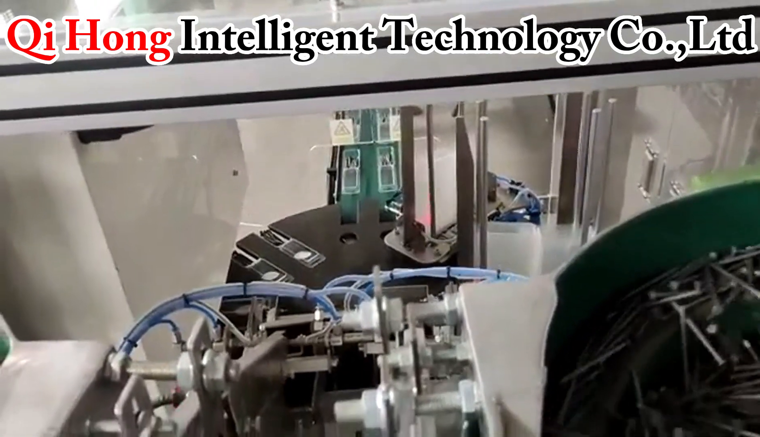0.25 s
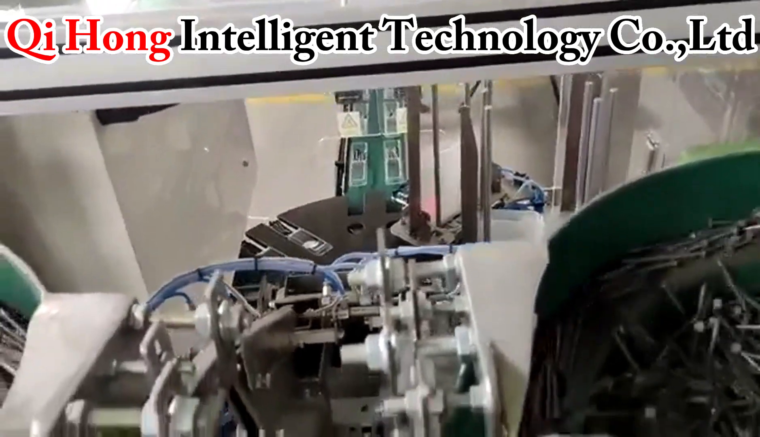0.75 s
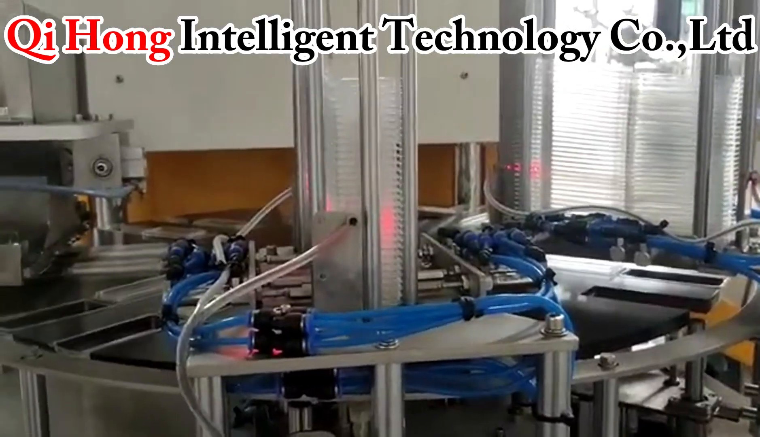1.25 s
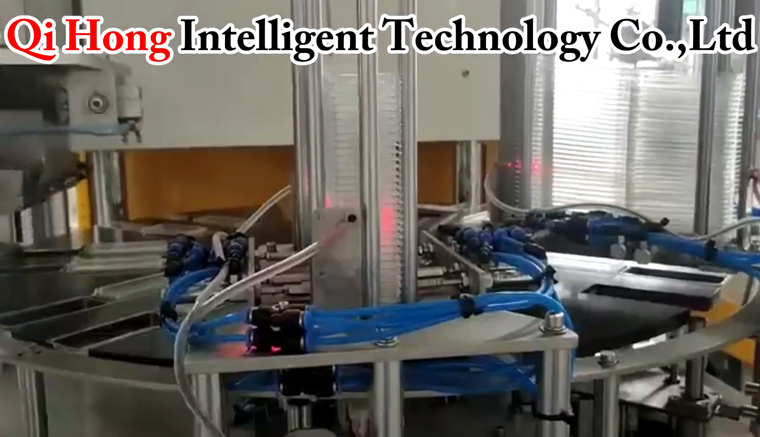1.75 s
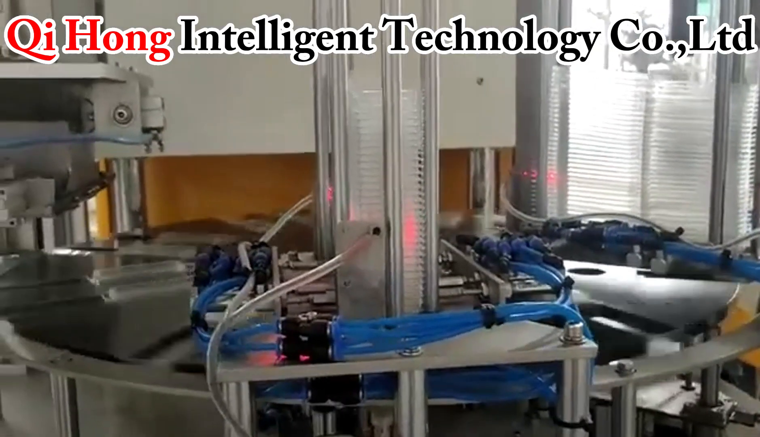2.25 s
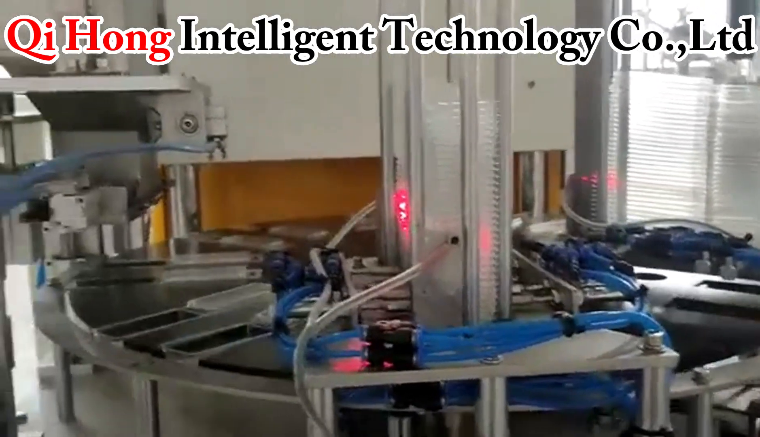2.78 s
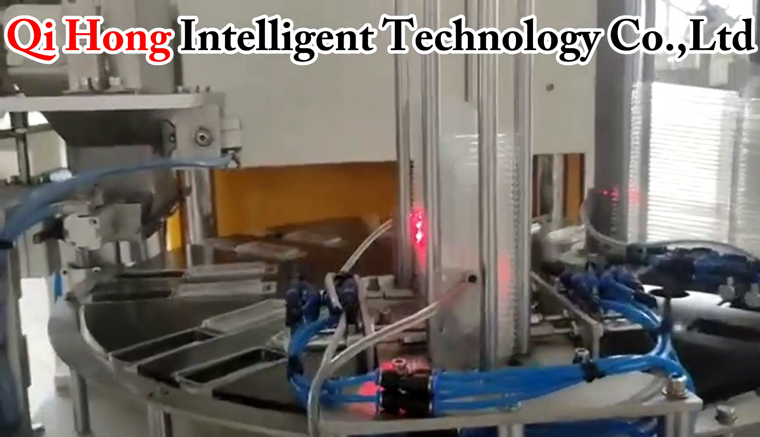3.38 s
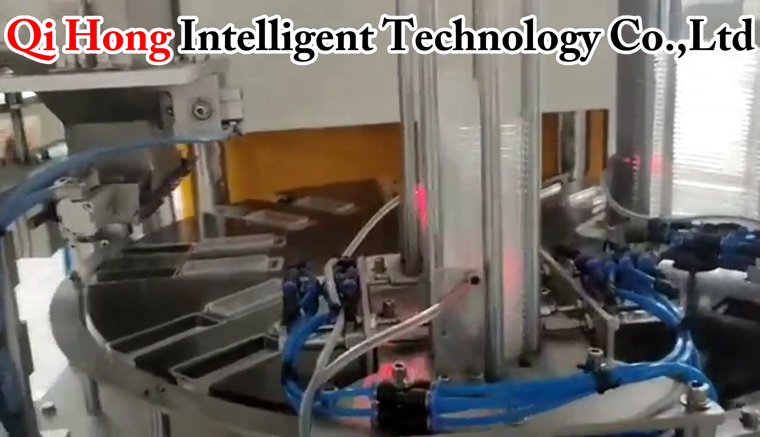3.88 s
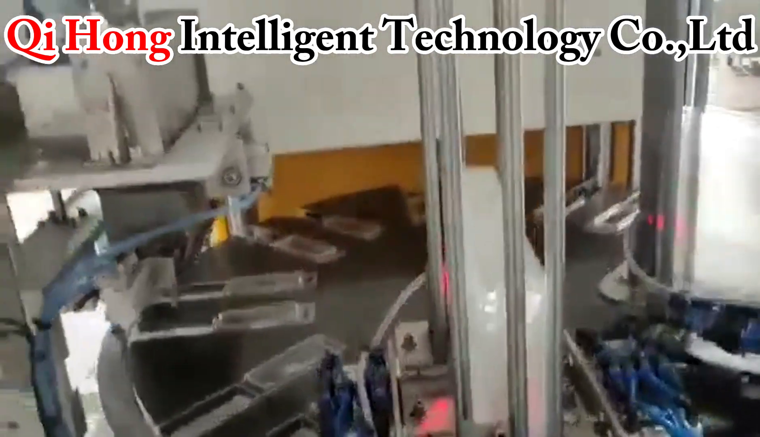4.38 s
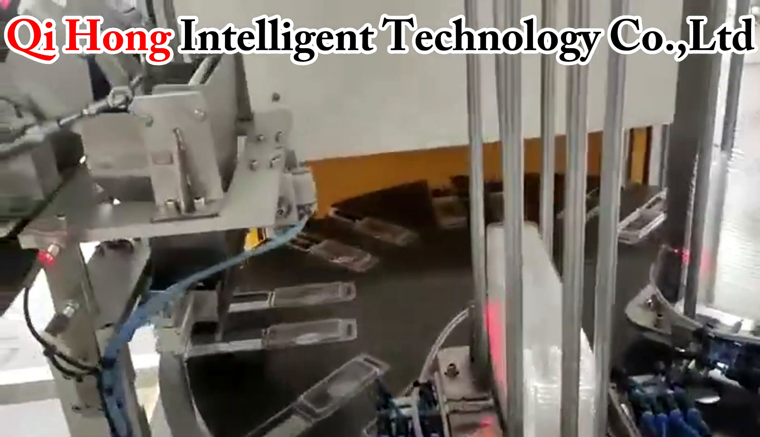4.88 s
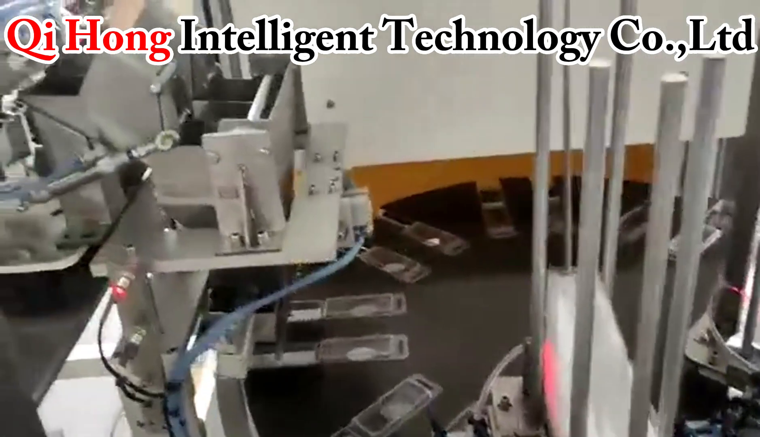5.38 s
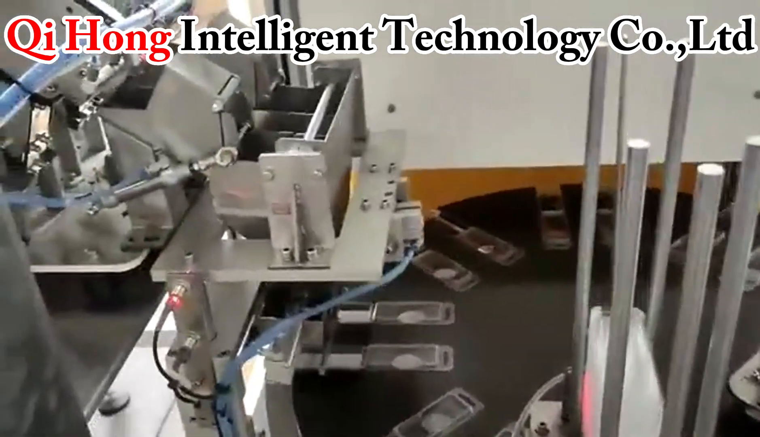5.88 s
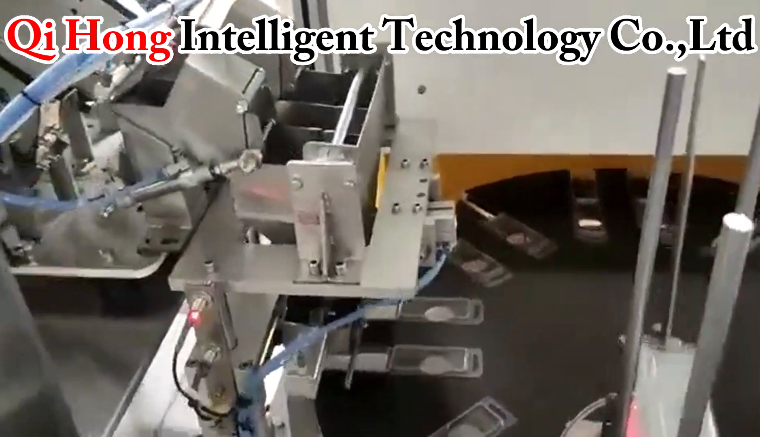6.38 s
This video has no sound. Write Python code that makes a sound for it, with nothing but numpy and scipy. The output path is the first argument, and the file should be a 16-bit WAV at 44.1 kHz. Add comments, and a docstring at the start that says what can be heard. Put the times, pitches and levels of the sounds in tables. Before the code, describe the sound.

Loud air hiss over a humming, rattling parts feeder, then a quieter motor drone with metallic knocks and valve puffs, building to heavy hissing bursts.

```python
"""Air hisses first, over a humming feeder and the low rumble of a factory hall: a pneumatic packing machine.
At 0.83 s the sound fades out and in at a cut to a second shot, taken elsewhere, near two motors.
Hiss, rumble and clatter are shaped noise, the drives are wavering tones, and strokes and puffs gate the air.
Cylinder knocks ring the steel frame and valves push out air; knocks and pushes also reflect in the hall."""
import sys
import numpy as np
from scipy import signal
from scipy.io import wavfile
from scipy.ndimage import uniform_filter1d

SR = 44100
rng = np.random.default_rng(int(sys.argv[2]) if len(sys.argv) > 2 else 0)


def generate_wav(sig):
    """Save sig (samples, or channels by samples) to the path in sys.argv[1] as 16-bit PCM at SR."""
    pcm = np.round(np.clip(np.atleast_2d(sig).T, -1, 1) * 32767).astype(np.int16)
    wavfile.write(sys.argv[1], SR, pcm)


N = 292383
CUT_S = .83  # cut from the first shot to the second, taken at another place


def amp(db):
    """Decibels to gain."""
    return 10 ** (np.asarray(db) / 20)


def unit(x):
    """Scales to rms 1."""
    return x / np.sqrt(np.mean(x ** 2) + 1e-20)


def smooth_twice(x, first, second, axes=(-1, -1)):
    """Two moving averages, their lengths given in samples, frames or bins."""
    return uniform_filter1d(uniform_filter1d(x, first, axis=axes[0]), second, axis=axes[1])


def curve(rows, column=1):
    """One column of a time table, joined by straight lines at every sample."""
    rows = np.asarray(rows)
    return np.interp(np.arange(N) / SR, rows[:, 0], rows[:, column])


def by_place(first, second):
    """What is heard at the first place, then from the cut on at the second."""
    return np.where(np.arange(N) < CUT_S * SR, first, second)


def resonate(x, hz, width):
    """Shifts hz down to zero, smooths, and shifts back: a resonance of gain 1."""
    turn = np.exp(2j * np.pi * hz * np.arange(len(x)) / SR)
    r = np.exp(-np.pi * width / SR)
    return 2 * (turn * signal.lfilter([1 - r], [1, -r], x / turn)).real


def resonate_twice(x, hz, width):
    """Two equal resonances in a row, scaled to rms 1, for steeper skirts."""
    return unit(resonate(resonate(x, hz, width), hz, width))


def noise(spectrum, size, patchy_db, ringing_db, flicker_db):
    """Random short-time spectra with broad patches, thin lingering streaks and a flicker shared by all bins."""
    hop, hz = size // 4, np.fft.rfftfreq(size, 1 / SR)
    real, imag, patches, streaks = rng.standard_normal((N // hop + 5, len(hz), 4)).T
    # axis 0 is frequency, axis 1 is time
    patches = unit(smooth_twice(patches, 8, 7, axes=(0, 1)))
    streaks = unit(smooth_twice(streaks, 2, 16, axes=(0, 1)))
    flicker = unit(uniform_filter1d(rng.standard_normal(real.shape[1]), size=4))
    f, db = np.transpose(spectrum)
    colour = np.interp(np.log(hz + 1), np.log(f + 1), db)[:, None]
    level_db = colour + patchy_db * patches + ringing_db * streaks + flicker_db * flicker
    frames = (real + 1j * imag) * amp(level_db)
    return unit(signal.istft(frames, nperseg=size, noverlap=size - hop)[1][:N])


def hum(lines):
    """Each line is a tone blended with narrow noise, so that it wavers in level and pitch."""
    t, out = np.arange(N) / SR, 0
    for hz, db, width, steady in lines:
        wavering = resonate_twice(rng.standard_normal(N), hz, width)
        tone = np.sqrt(2) * np.sin(2 * np.pi * (hz * t + rng.random()))
        out = out + amp(db) * (np.sqrt(steady) * tone + np.sqrt(1 - steady) * wavering)
    return out


def hall_rumble():
    """Low noise of the hall, swelling and sinking under everything."""
    # colour of the rumble, relative: [f/Hz, level/dB]
    spectrum = [(8.8, -41), (15, 9.5), (32, -6), (75, -5), (130, -0.5), (189, -8), (317, -12.5),
                (363, -18.5), (586, -20), (628, -18), (900, -27.5), (1170, -36), (1980, -120)]
    # loudness of the rumble: [t/s, level/dB rms]
    swell = [(0, -29), (.3, -32.5), (.5, -26), (.83, -29.5), (1.1, -37), (1.65, -35.5), (1.76, -27),
             (2.0, -39.5), (2.6, -39.5), (2.95, -35), (3.3, -38), (3.8, -44.5), (4.33, -38), (4.45, -26.5),
             (4.64, -33), (4.8, -41), (5.0, -31.5), (5.5, -31.5), (5.85, -27), (6.17, -33.5), (6.63, -25)]
    return amp(curve(swell)) * noise(spectrum, size=2048, patchy_db=1.0, ringing_db=.8, flicker_db=.8)


def feeder():
    """Vibrating feeder bowl and motors close to the first place, over a steady drone."""
    # drone: [f/Hz, level/dB rms, width/Hz of each resonance, steady share 0-1]
    drone = [(40, -29, 8, .5)]
    # bowl and motors, before their swell: [f/Hz, level/dB rms, width/Hz of each resonance, steady share 0-1]
    bowl_lines = [(107.7, -34, 14, .4), (160, -39, 12, .3), (259, -41, 14, .3), (629.8, -38, 14, .55),
                  (678.3, -41, 16, .3), (737.5, -45, 16, .2), (791, -49, 16, .2), (915.2, -45, 35, .1),
                  (1160, -51, 16, .1), (6660, -42, 35, 0)]
    # gain on bowl and motors: [t/s, level/dB]
    swell = [(0, -5), (.3, 3), (.83, 4.5)]
    return hum(drone) + hum(bowl_lines) * amp(curve(swell))


def motors():
    """Two motors near the second place, each a group of tones with its own swell."""
    # one list per motor, before its swell: [f/Hz, level/dB rms, width/Hz of each resonance, steady share 0-1]
    motor_lines = [
        [(37.6, -39, 1.3, 0.2), (99.8, -40.5, 4.1, .5), (276, -63.5, 12, 0.5), (1190, -65, 16, 0),
         (1366, -63, 19, .2), (1536, -64, 14, 0), (1773, -64.5, 13, 0)],
        [(127.3, -46.5, 16, .3), (316.7, -48, 12, 0.29), (631, -58, 25, 0), (1842, -57, 85, 0.01)],
    ]
    # gain on each motor: [t/s, first level/dB, second level/dB]
    swell = [(.83, -10, -30), (.9, 2.5, -25), (1.7, 2, -10), (1.95, -14, -18), (4.8, -20, -18),
             (5.0, -12.5, -8.5), (5.4, -18, 5.5), (6.63, -3.5, 7)]
    return sum(hum(lines) * amp(curve(swell, column=k + 1)) for k, lines in enumerate(motor_lines))


def moving_parts(level):
    """Blurred clatter: nails shaking in the feeder bowl at the first place, slides and chains at the second."""
    # nails in the bowl, relative: [f/Hz, level/dB]
    nail_spectrum = [(120, -32), (200, -16), (264, -9), (566, -5.5), (632, -5), (834, -8), (945, -3.5),
                     (1370, -11.5), (3110, -14), (5500, -13), (7150, -39), (12100, -120)]
    # slides and chains, relative: [f/Hz, level/dB]
    slide_spectrum = [(180, -21.5), (300, -2), (383, -12.5), (738, -7.5), (942, -13), (1280, -13),
                      (1480, -15), (2780, -17), (4640, -15), (5500, -9.5), (7150, -23), (12100, -120)]
    nails = noise(nail_spectrum, size=1024, patchy_db=1.5, ringing_db=2.5, flicker_db=1.3)
    slides = noise(slide_spectrum, size=1024, patchy_db=1.6, ringing_db=3.5, flicker_db=1.1)
    return level * by_place(nails, slides)


def pushes():
    """Valve exhaust: pressure builds, then drops through zero as the valve lets go."""
    # one swing of pressure each: [t/s of the zero crossing, level/dB, width/s]
    swings = [(1.746, -32.5, 0.0029), (1.783, -29, 0.004), (2.687, -22.5, 0.002), (2.786, -29.5, 0.0046),
              (3.545, -26, 0.0031), (3.58, -28.5, 0.004), (3.619, -27.5, 0.0024), (3.701, -20, .0021),
              (4.119, -19.5, 0.0021), (4.198, -24.5, 0.0033), (4.386, -22, 0.0052), (4.439, -20, 0.0029),
              (4.458, -16, 0.0027), (4.512, -19.5, 0.008), (5.449, -18.5, 0.0034), (5.488, -26, 0.0037),
              (5.776, -17.5, 0.0031), (5.869, -15.5, 0.0022), (5.949, -15, 0.0037), (5.364, -22, 0.0034),
              (6.494, -33, 0.0032)]
    t, out = np.arange(N) / SR, 0
    for s, db, width in swings:
        swing = np.tanh(3 * (s - t) / width)
        out = out + amp(db) * swing * np.exp(-abs((t - s) / width / 1.5) ** 1.6)
    return out


def knocks():
    """Cushioned, rattling cylinder blows ring the struck parts and the frame, with a dull crack."""
    # rings of the struck parts; one blow may start several:
    # [t/s, level/dB, ring f/Hz, rise/s, crack level/dB and frame level/dB relative to the level]
    rings = [(.841, -20.5, 312, 0.0056, -11, -4), (1.73, -23.5, 340, 0.0074, -21, -13),
             (1.804, -23.5, 533, 0.0088, -6.5, 5), (1.812, -29, 538, .02, -12, -14),
             (1.813, -34, 1006, 0.015, -16, -14), (2.108, -31.5, 230, 0.0086, -22, -16),
             (2.185, -33, 282.5, 0.013, -15, -9), (2.242, -31.5, 239, 0.0087, -18, -4.5),
             (2.69, -36, 793, 0.011, -2.5, -2), (2.928, -30, 380, .012, -10, -1),
             (2.942, -23, 457, 0.0082, -16.5, -8), (2.943, -23.5, 144, 0.014, -25, -11),
             (2.964, -25, 452, 0.0087, -28, -10), (3.172, -23, 243, 0.01, -28, -19),
             (3.193, -30, 328, 0.0095, -17, -27), (3.291, -30, 261, 0.0098, -24, -12),
             (3.442, -30, 440, 0.004, -6, -21), (3.449, -19, 454.6, 0.0086, -14, -14),
             (3.536, -28.5, 770, 0.0017, -15, -23), (3.621, -31.5, 764, 0.0032, -16, -15),
             (3.755, -42, 4300, 0.0058, -21, -19), (4.209, -20, 309.9, 0.0027, -26, -15),
             (4.23, -26.5, 416, 0.0071, -25, -12), (4.311, -33.5, 1246, 0.013, -21, -10),
             (4.385, -28.5, 1280, 0.0047, -7, -7), (4.44, -27.5, 514, 0.0073, -1.5, 9),
             (4.453, -30, 1260, 0.012, -11, -15), (4.484, -27.5, 316, 0.013, -1.5, -14),
             (4.52, -26.5, 745, 0.008, -19, -13), (4.543, -25, 740, 0.0094, -26, -7),
             (4.604, -33.5, 1300, 0.015, 3, -4), (4.639, -26.5, 257.4, 0.0077, -16, 4),
             (4.854, -30, 156.8, 0.0074, -15.5, -10), (5.089, -27, 334, 0.011, -12, -8),
             (5.257, -37.5, 1314, 0.022, -3.5, 2.5), (5.546, -38, 4360, .015, -10, -9)]
    # modes of the steel frame: [f/Hz, level/dB, t60/s]
    modes = [(323, -8, .13), (455, -2, .12), (535, -6, .25), (845, -16, .05), (1020, -13, .1),
             (1270, -18, .05)]
    out, t = np.zeros(N + SR), np.arange(SR // 2) / SR
    frame = sum(amp(db - 60 * t / t60) * np.sin(2 * np.pi * hz * t) for hz, db, t60 in modes)
    dull = signal.butter(2, 1300, fs=SR)
    for s, db, hz, rise, crack_db, frame_db in rings:
        rattle = rng.standard_normal(len(t))
        u = t / rise
        push = u * np.exp((1 - u ** 1.16) / 1.06)  # the cushion stops the blow quickly
        contact = resonate_twice(rattle, 0, 130)  # uneven contact shakes level and pitch
        ring = push * np.sin(2 * np.pi * hz * t + .35 * contact) * amp(1.2 * contact)
        shake = signal.fftconvolve(push * rattle, frame)[:len(t)] / np.linalg.norm(push)
        crack = push * unit(signal.lfilter(*dull, rattle))
        at = round(s * SR)
        out[at:at + len(t)] += amp(db) * (ring + amp(frame_db) * shake + amp(crack_db) * crack)
    return out[:N]


def hall(x):
    """Sparse reflections of random sign, dying away."""
    t60 = 0.66  # s
    # one reflection somewhere in every 20 samples, the first after about 9 ms
    at = np.arange(400, SR // 2 - 20, 20)
    taps = np.zeros(SR // 2)
    signs = rng.choice([-1., 1.], len(at))
    taps[at + rng.integers(0, 20, len(at))] = signs * amp(-60 * at / SR / t60)
    return signal.fftconvolve(x, taps / np.linalg.norm(taps))[:N]


def activity():
    """Gains of hiss and clatter: strokes rise, hold and bleed away, puffs jump and die, all over an idle floor."""
    # working strokes, air blowing while parts move; the hold counts from the opening:
    # [open t/s, rise/s, hold/s, hiss level/dB, clatter level/dB, drift/dB per s during the hold]
    strokes = [(-.35, .75, 1.3, -22, -29, -3), (.83, .003, .965, -40, -44.5, 6),
               (3.17, .04, 1.12, -39.5, -50, -0.5), (4.298, .01, .37, -25, -33, 5),
               (4.8, .1, .25, -39, -43, 0), (5.188, .01, .14, -21, -31.5, -8.5),
               (5.375, 0.0086, .07, -23.5, -32.5, -3), (5.47, .01, .035, -23.5, -32, -5),
               (5.535, .02, .455, -24, -33.5, -1), (6.0, 0.016, .14, -28, -34, -6),
               (6.172, .02, .7, -27, -35, 4)]
    # short puffs as single valves fire: [peak t/s, rise/s, hiss level/dB, clatter level/dB, t60/s]
    puffs = [(0.461, .03, -23, -34, 0.18), (.59, .04, -26, -38, .4), (.842, .012, -29.5, -32, 0.58),
             (.966, 0.019, -30, -40, 0.17), (1.66, 0.057, -29, -55, 0.36), (1.814, 0.018, -27, -32, 0.11),
             (1.85, .02, -41, -46, 0.99), (1.9, .01, -37.5, -57, 0.23), (1.96, .012, -38, -51, .2),
             (2.03, .02, -50, -58, 0.17), (2.2, 0.022, -51, -52, .3), (2.31, .02, -58, -53, .3),
             (2.691, 0.014, -31.5, -45, 0.18), (2.715, .03, -50, -41, .4), (2.79, .02, -42.5, -53, 0.25),
             (2.965, .05, -40, -49, .25), (3.19, .01, -45, -48, .15), (3.25, .02, -41, -56, 0.13),
             (3.54, .01, -36.5, -46, 0.16), (3.61, .01, -39, -52, .15), (3.72, .02, -37, -44, .15),
             (4.123, 0.02, -36.5, -38.5, 0.13), (4.212, 0.025, -32.5, -35.5, 0.11),
             (4.389, .005, -17, -36, .06), (4.455, 0.11, -21, -23.5, 0.53), (4.61, .02, -22, -33, .2),
             (4.75, .03, -30, -38.5, .35), (4.944, .06, -29, -39, .2), (5.014, .01, -28, -39, 0.12),
             (5.052, .008, -26, -34, 0.23), (5.08, 0.023, -24, -31, .35), (5.27, 0.032, -23.5, -30, 0.21),
             (5.556, 0.017, -25, -30.5, 0.13), (5.63, .015, -28, -31, 0.16), (5.92, .01, -25.5, -37, .15),
             (5.969, 0.017, -24, -29.5, 0.14)]
    idle_db = [[-60.5], [-56]]  # hiss of leaks, clatter of far machines
    release = np.array([[260], [120]])  # dB per s: pressure bleeds away fast, parts run down slower
    sputter_db, sputter_s = .6, .025
    t = np.arange(N) / SR
    power = amp(idle_db) ** 2 * np.ones(N)
    for start, rise, hold, hiss_db, clatter_db, drift in strokes:
        u = t - start
        held = amp(drift * np.minimum(u, hold) - release * np.maximum(u - hold, 0))
        same_shot = (start < CUT_S) == (t < CUT_S)
        shape = np.clip(u / rise, 0, 1) * held * same_shot
        power += (amp([[hiss_db], [clatter_db]]) * shape) ** 2
    for s, rise, hiss_db, clatter_db, t60 in puffs:
        near = slice(max(round((s - rise) * SR), 0), round((s + t60) * SR))
        u = t[near] - s
        shape = np.clip(1 + u / rise, 0, 1) ** 2 * amp(-60 * np.maximum(u, 0) / t60)
        power[:, near] += (amp([[hiss_db], [clatter_db]]) * shape) ** 2
    # unsteady flow shakes hiss and clatter together
    span = round(sputter_s * SR / 2)
    sputter = unit(smooth_twice(rng.standard_normal(N), span, span))
    return np.sqrt(power) * amp(sputter_db * sputter)


def jets(level):
    """Turbulent air from nozzles and valves."""
    # colour of the hiss, peaked by the microphone port, relative: [f/Hz, level/dB]
    spectrum = [(2350, -26.5), (4000, -14.5), (4790, -18.5), (5310, -7), (6130, 4.5), (6810, 2), (7550, -2),
                (7780, -11.5), (8100, -40.5), (8170, -31), (8300, -68), (10800, -98.5), (18300, -120)]
    return level * noise(spectrum, size=1024, patchy_db=1.65, ringing_db=3.0, flicker_db=.8)


def cut_fade():
    """Gain that fades out and back in at the cut."""
    fade_out_s, fade_in_s, dip_db = .035, .012, -16
    t = np.arange(N) / SR - CUT_S
    depth = np.clip(np.minimum(1 + t / fade_out_s, 1 - t / fade_in_s), 0, 1)
    return amp(dip_db * depth ** 2)


def scene():
    """Knocks and pushes ring in the hall over the other layers; one microphone feeds both channels."""
    hiss_level, clatter_level = activity()
    background = hall_rumble() + by_place(feeder(), motors())
    blows = pushes() + knocks()
    reflections = amp(-9.5) * hall(blows)
    machine = moving_parts(clatter_level) + blows + reflections + jets(hiss_level)
    mono = (background + machine) * cut_fade()
    return np.array([mono, mono])


def record(dry):
    """A small microphone's bass roll-off, then the band limit of a voice-grade recorder."""
    bass_hz, edge_hz = 24, 7980
    thin = signal.lfilter(*signal.butter(2, bass_hz, "high", fs=SR), dry)
    band = signal.firwin(1023, edge_hz, window=("kaiser", 9), fs=SR)
    return signal.oaconvolve(thin, band[None], "same")


dry = scene()
out = record(dry)
generate_wav(out)
```